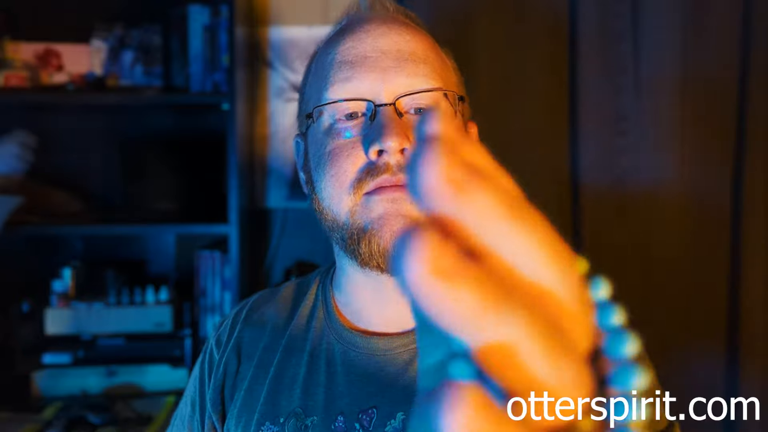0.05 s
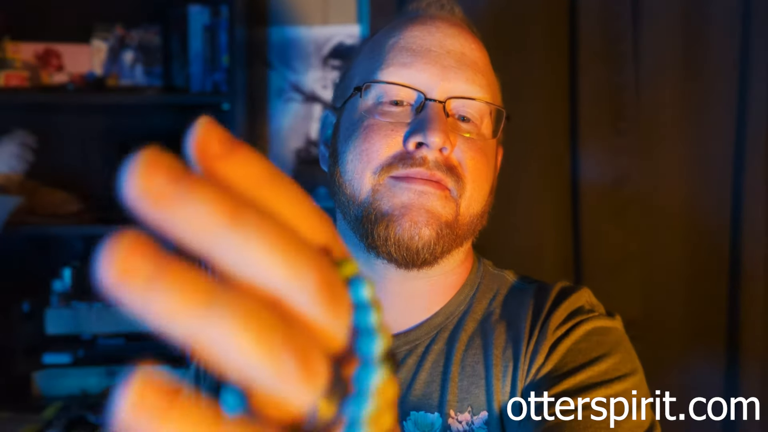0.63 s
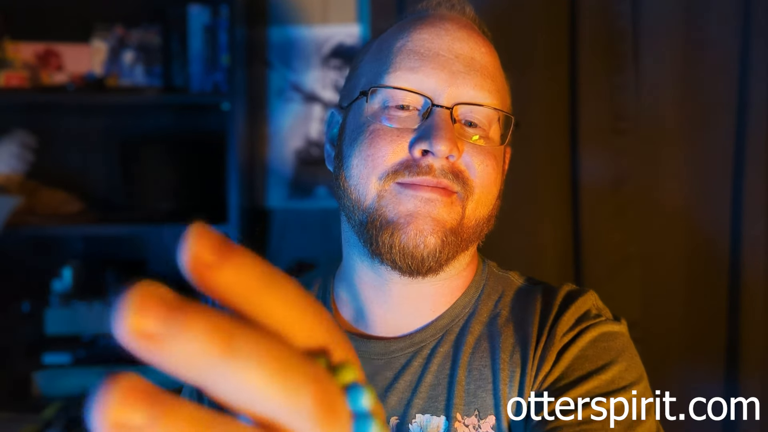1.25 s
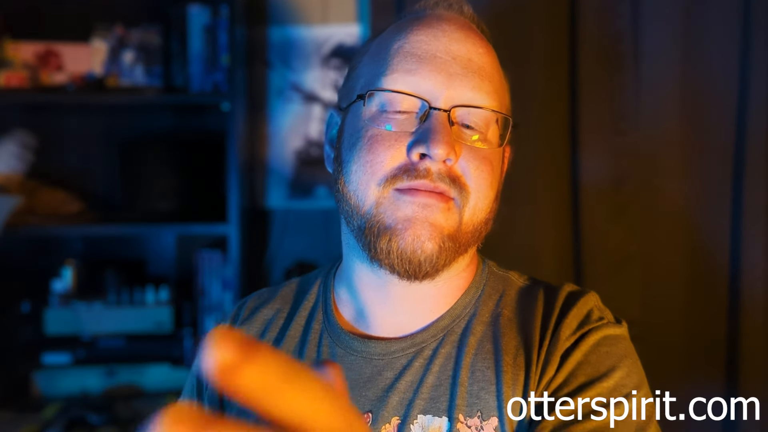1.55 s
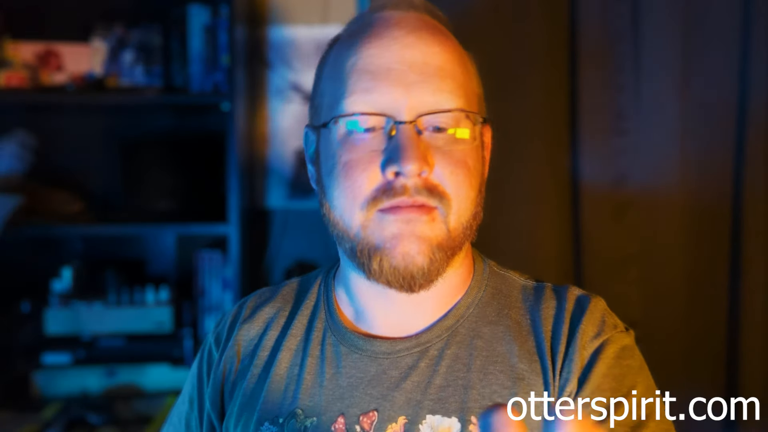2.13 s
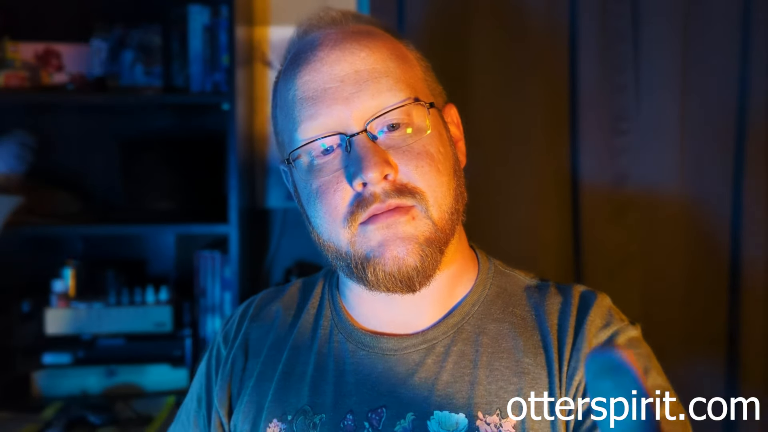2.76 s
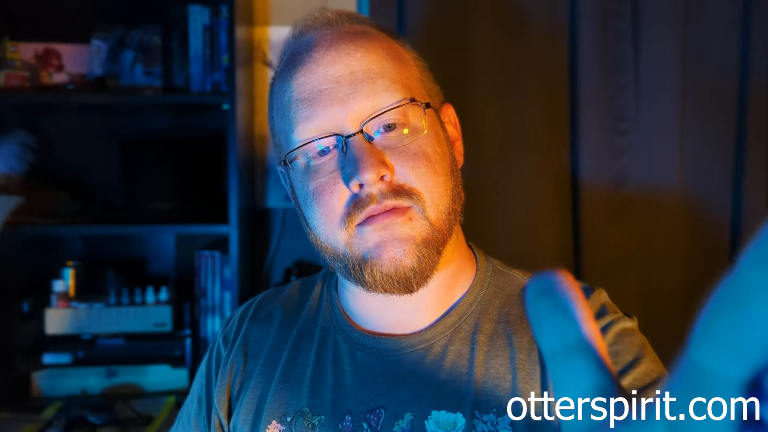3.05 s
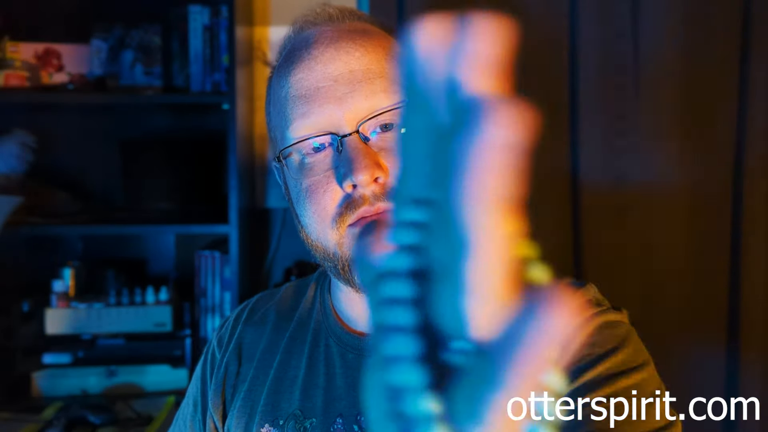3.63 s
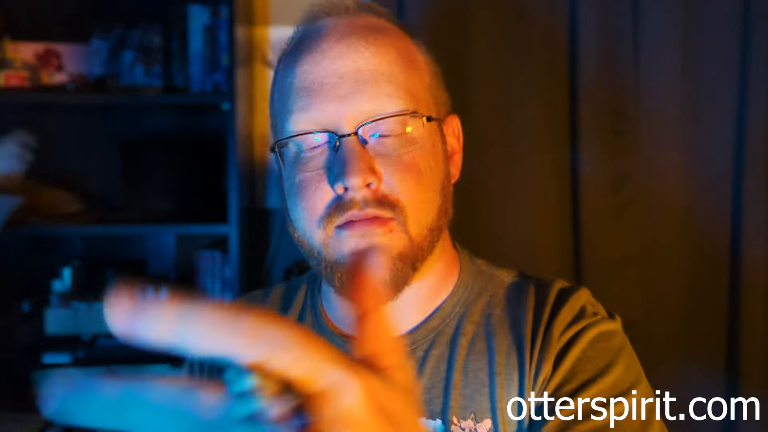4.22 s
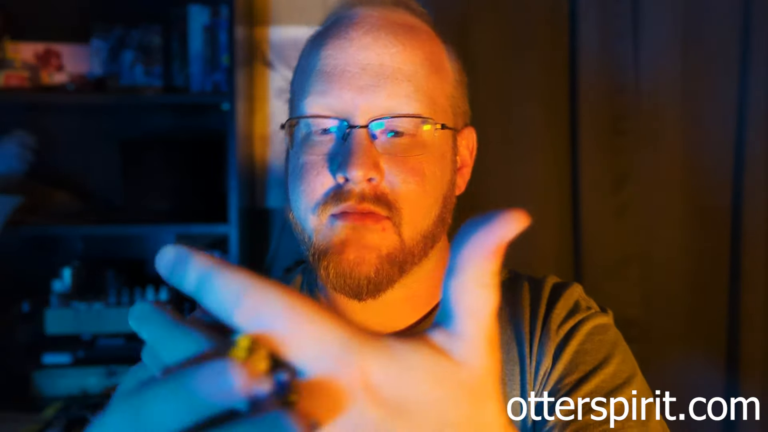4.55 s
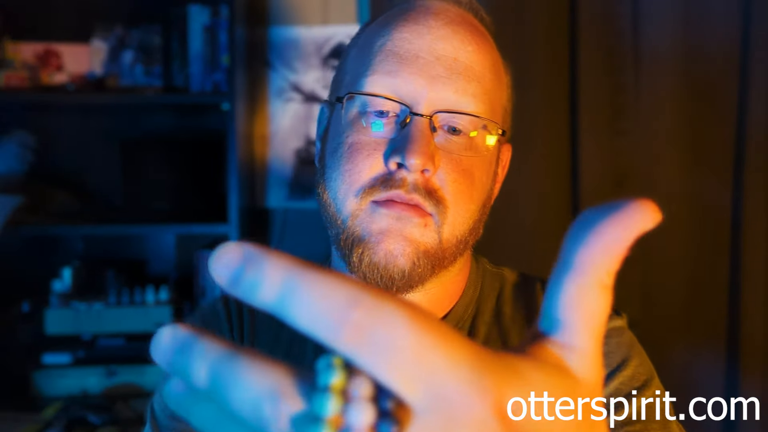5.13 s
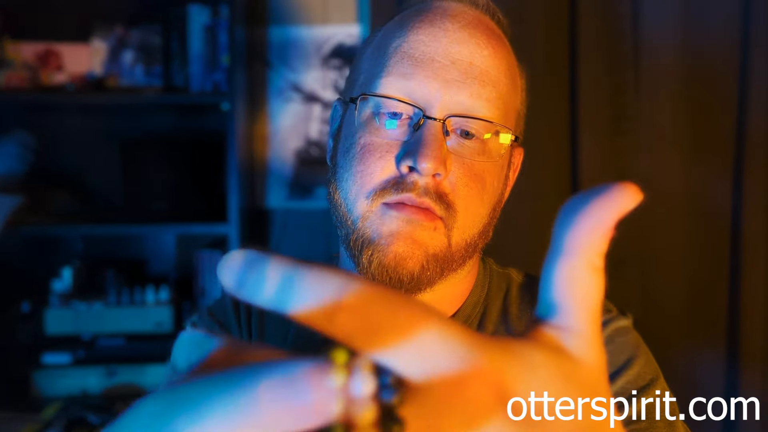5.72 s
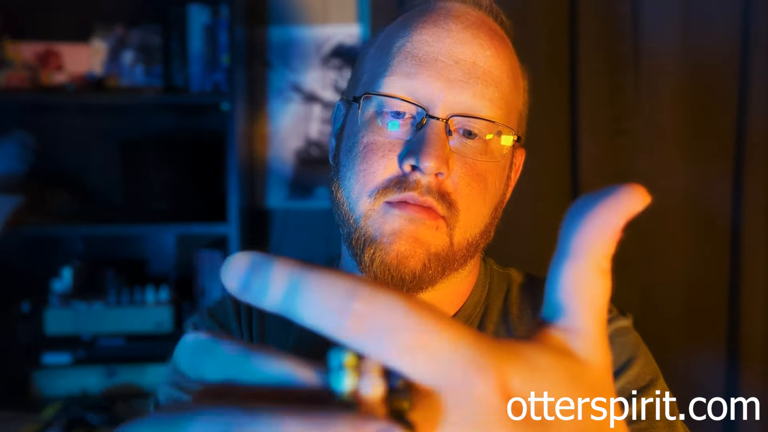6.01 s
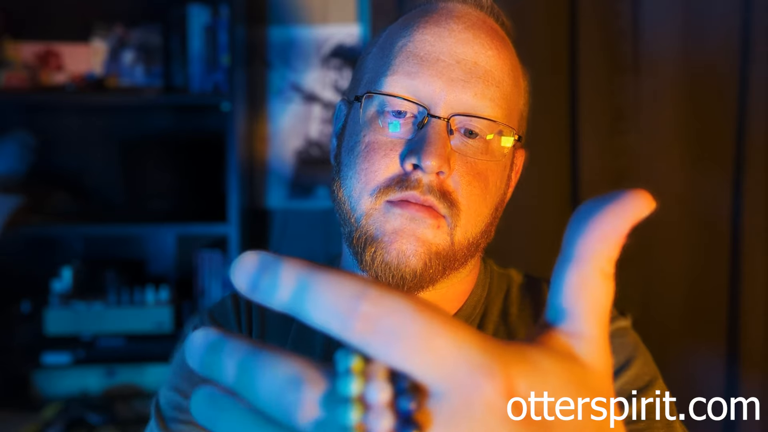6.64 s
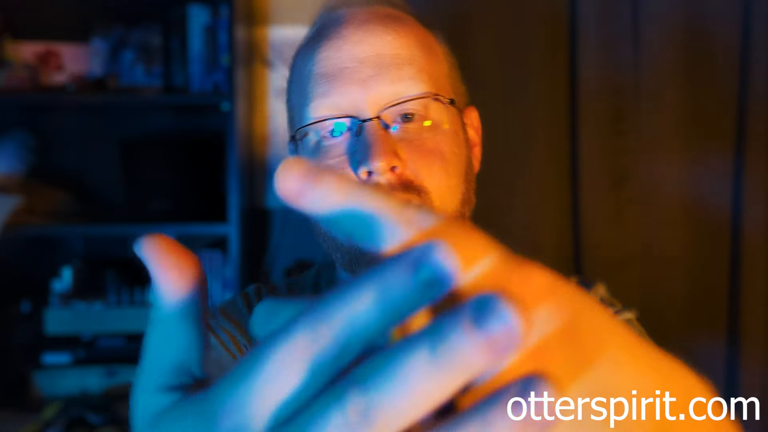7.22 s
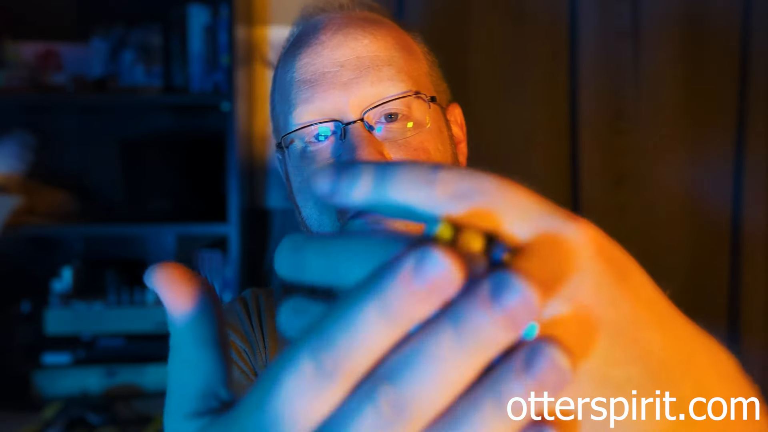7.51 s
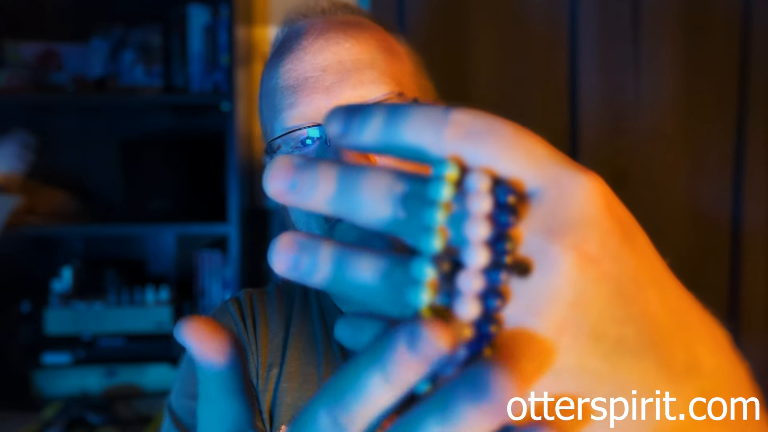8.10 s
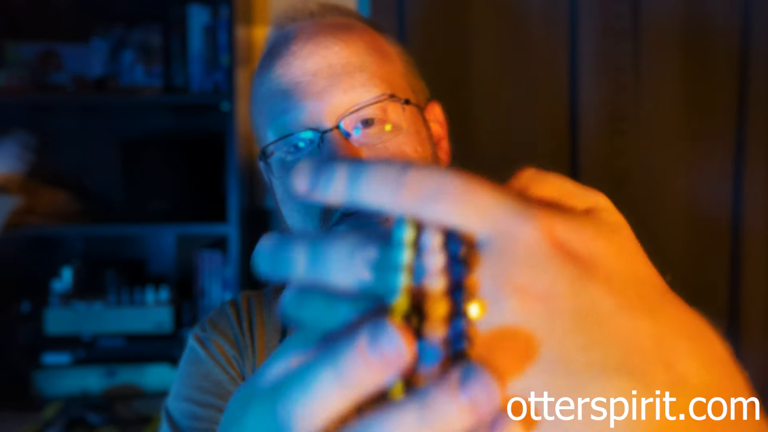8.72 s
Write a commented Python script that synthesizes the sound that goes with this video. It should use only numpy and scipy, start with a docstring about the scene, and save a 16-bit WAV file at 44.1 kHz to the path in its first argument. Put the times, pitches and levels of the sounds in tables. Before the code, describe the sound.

Polished stone beads click, snap and rattle against each other up close, with soft skin rubbing, in a small quiet room.

```python
"""Polished stone beads snap against each other as bracelets are rolled between two hands.
Some beads ring briefly, and lighter contacts chatter in between.
Pressed beads grind as they stick and slip, and skin rubs over the strands.
The hands are close to a stereo microphone in a small, quiet room. The hardest snaps overload the
recorder, and a dull low thud under some hard snaps is probably the recorder distorting."""
import sys
import numpy as np
from scipy import signal
from scipy.fft import rfft, irfft, next_fast_len
from scipy.io import wavfile
from scipy.ndimage import uniform_filter1d

SR = 44100
rng = np.random.default_rng(int(sys.argv[2]) if len(sys.argv) > 2 else 0)


def inscribe(sig):
    """Save sig as 16-bit PCM at rate SR to the path in sys.argv[1].

    A 1-D sig is mono; a 2-D sig holds one channel per row.
    Samples are clipped to [-1, 1] before scaling.
    """
    pcm = np.round(np.clip(np.atleast_2d(sig).T, -1, 1) * 32767)
    wavfile.write(sys.argv[1], SR, pcm.astype(np.int16))


N = 395136


def amp(db):
    """Turn decibels into a gain."""
    return 10 ** (np.asarray(db) / 20)


def unit(x):
    """Scale a signal to an average (rms) level of 1."""
    return x / np.sqrt(np.mean(x ** 2) + 1e-20)


def at_hz(rows, hz):
    """Read a (frequency, value) table between its rows, on a log frequency axis."""
    freqs, values = np.transpose(rows)
    return np.interp(np.log(hz + 1), np.log(freqs), values)


def at_time(rows, times, column=1):
    """Read one column of a table at the given times."""
    rows = np.asarray(rows)
    return np.interp(times, rows[:, 0], rows[:, column])


def filtered(x, gain):
    """Turn each frequency of x up or down by gain(hz)."""
    size = next_fast_len(N + SR // 2)
    return irfft(rfft(x, size) * gain(np.fft.rfftfreq(size, 1 / SR)), size)[..., :N]


def tone_filter(colour, size):
    """A filter with the given tone colour that never sounds before the hit (minimum phase)."""
    cepstrum = irfft(np.log(amp(at_hz(colour, np.fft.rfftfreq(size, 1 / SR)))))
    cepstrum[1:size // 2] *= 2
    cepstrum[size // 2 + 1:] = 0
    return np.exp(rfft(cepstrum))


def stereo_noise(shape, apart):
    """Noise shared by left and right, plus some of their own, scaled by `apart`."""
    return rng.standard_normal(shape) + apart * rng.standard_normal((2, *shape))


def same_energy(waves):
    """Give each short stereo wave the energy of 1 ms at level 1."""
    energy = (waves ** 2).sum(-1, keepdims=True).mean(0)
    return waves * np.sqrt(SR / 1000 / energy)


# Tone of the background noise: (frequency [Hz], relative level [dB])
NOISE_COLOUR = [(20, 1), (45, 4.5), (70, -4), (110, -2.5), (200, -10), (320, -12), (520, -19.5),
                (1200, -25.5), (2200, -29), (5000, -30.5), (16000, -33)]
# Steady tones of the hum: (frequency [Hz], level [dB])
HUM_TONES = [(99, -68), (120, -68), (308, -73)]
def background():
    """Low room rumble and microphone hiss, with a faint hum."""
    t = np.arange(N) / SR
    noise = unit(filtered(stereo_noise((N,), apart=1.0), lambda hz: amp(at_hz(NOISE_COLOUR, hz))))
    hum = sum(amp(db) * np.sqrt(2) * np.sin(2 * np.pi * (hz * t + rng.random((2, 1)) / 4))
              for hz, db in HUM_TONES)
    return amp(-52.5) * noise + hum


# How long the room echoes: (frequency [Hz], time to fade by 60 dB [s])
ROOM_FADE = [(200, 0.052), (2000, 0.11), (7000, 0.065), (11500, 0.083), (16000, 0.033)]
def room(x, block=2048, count=12):
    """The walls add a short, soft tail; several tails take turns, as if the hands were moving."""
    hz, t, noise = signal.stft(rng.standard_normal((count, 2, SR // 4)), SR, nperseg=256)
    fade = amp(-60 * t / at_hz(ROOM_FADE, hz)[:, None])
    tails = signal.istft(noise * fade, SR, nperseg=256)[1]
    tails *= np.minimum(np.arange(tails.shape[-1]) / SR / .004, 1)  # swell over 4 ms
    tails /= np.linalg.norm(tails, axis=-1, keepdims=True)
    out = np.zeros((2, N + SR))
    for k, start in enumerate(range(0, N, block)):
        echo = signal.fftconvolve(x[:, start:start + block], tails[k % count], axes=1)
        out[:, start:start + echo.shape[1]] += echo
    return out[:, :N]


# Where the hands are: (time [s], left minus right level [dB], head start of the left side [microseconds])
HAND_PLACE = [(0, -1, 42), (0.5, -4.5, 31.2), (1.05, -5, 26), (1.55, -6.5, 4.4), (2.1, -2, 4.97),
              (2.55, 5.5, 18.7), (3.15, 3, 41), (3.5, 0.5, 49), (4.05, -4.5, 20.4), (4.5, -6.5, 4.2),
              (5, -4, 10), (7.05, -4.5, 11.8), (7.4, -1, 29), (8.25, -2.3, 37.8), (8.96, -2.5, 16.9)]
def placed(times, waves, margin=8):
    """Play short waves at the given times, each a little to one side of the hands."""
    pan_db = at_time(HAND_PLACE, times) + 3 * rng.standard_normal(len(times))
    lead_s = (at_time(HAND_PLACE, times, column=2) + 6 * rng.standard_normal(len(times))) / 1e6
    gains = amp([pan_db / 2, -pan_db / 2])
    gains /= np.sqrt(np.mean(gains ** 2, axis=0))
    waves = np.pad(waves, ((0, 0), (0, 0), (margin, margin)))
    hz = np.fft.rfftfreq(waves.shape[-1], 1 / SR)
    time_shift = np.exp(1j * np.pi * hz * np.array([lead_s, -lead_s])[..., None])
    waves = irfft(rfft(waves) * time_shift) * gains[..., None]
    starts = np.abs(np.round(times * SR) - margin).astype(int)
    index = starts[:, None] + np.arange(waves.shape[-1])
    return np.array([np.bincount(index.ravel(), side.ravel(), N)[:N] for side in waves])


# The hollow between the rubbing palms: (time [s], upper resonance [Hz], level [dB])
PALM_HOLLOW = [(0, 6690, -45.5), (.27, 6700, -50), (.36, 6940, -58), (2.35, 8000, -70), (2.6, 8340, -63.5),
               (2.95, 7850, -49), (3.35, 6900, -50.5), (3.65, 6910, -64), (3.85, 6880, -47.5),
               (4.3, 7000, -83)]
def palms(width_hz=720, low_hz=2170, low_db=-17):
    """Skin catches on the beads in tiny grains and sounds the hollow of the hands, lower as it opens."""
    t = np.arange(N) / SR
    phase = 2 * np.pi * np.cumsum(at_time(PALM_HOLLOW, t)) / SR
    flicker = unit(filtered(rng.standard_normal(N), lambda hz: 1 / (1 + (hz / 200) ** 2)))
    grain = amp(8 * flicker)
    band = filtered(stereo_noise((2, N), apart=1.0), lambda hz: 1 / (1 + (hz / width_hz) ** 3))
    hiss = band[:, 0] * np.cos(phase) + band[:, 1] * np.sin(phase)  # moved up to the resonance
    low = filtered(stereo_noise((N,), apart=0.5),
                   lambda hz: 1 / (1 + ((hz - low_hz) / (width_hz / 2)) ** 4))
    rub = unit(grain * hiss) + amp(low_db) * unit(grain * low)
    pan_db = at_time(HAND_PLACE, t)
    return rub * amp(at_time(PALM_HOLLOW, t, column=2)) * amp([pan_db / 2, -pan_db / 2])


# Beads grinding: (middle time [s], half length [s], lower resonance [Hz], base width [Hz], level [dB])
GRINDS = [(1.664, 0.0035, 4210, 800, -29), (2.619, 0.0022, 4280, 800, -28), (4.564, 0.048, 2650, 700, -42),
          (4.901, 0.035, 2293, 801.3, -56), (5.062, 0.01, 3357, 900, -35.5),
          (5.211, 0.032, 1849, 805, -44.5), (5.444, 0.0076, 2150, 1380, -31.5),
          (5.721, 0.01, 1920, 700, -48.5), (5.76, 0.0048, 2482, 1200, -37),
          (5.888, 0.011, 3568, 500, -35.5), (6.063, 0.016, 4150, 679.3, -41.5),
          (6.792, 0.018, 2420, 1000, -47), (7.358, 0.017, 2703, 900, -46),
          (7.828, 0.0038, 3000, 514.6, -45.5), (8.589, 0.03, 2998, 1003, -53),
          (8.717, 0.0081, 2065, 502, -48)]
def grinding(slips_per_second):
    """Pressed beads stick and slip; the slips ring two resonances of the strand in the fingers."""
    out = np.zeros((2, N))
    t = np.arange(SR // 4) / SR - 1 / 8
    freqs = np.fft.rfftfreq(len(t), 1 / SR)
    for middle, half_length, hz, width, db in GRINDS:
        slips = stereo_noise(t.shape, apart=0.35) * (0.03 + (rng.random(len(t)) < slips_per_second / SR))
        damping = 1.5j * freqs * width
        low, high = [(damping / (peak ** 2 - freqs ** 2 + damping)) ** 2 for peak in (hz, 1.73 * hz)]
        rasp = unit(irfft(rfft(slips) * (low + 0.78 * high), len(t)))
        swell = np.exp(-(t / half_length) ** 2 / 2)
        start = round((middle + t[0]) * SR)
        out[:, start:start + len(t)] += amp(db) * rasp * swell
    return out * amp([[-1.5], [1.5]])  # a little to the right


# A harder, shorter hit is brighter: (frequency [Hz], change per step of hardness [dB])
HARDNESS_TILT = [(6000, -2.5), (14000, 2)]
def contacts(count, colour, touch_s, apart, hardness=0, size=400):
    """The sound of a hit: a tiny burst of noise, brighter when harder, and a usually weaker rebound."""
    t = np.arange(size) / SR
    length, gap, bounce, angle = rng.standard_normal((4, count, 1))  # no two hits are alike
    fade_s = touch_s * np.exp(0.46 * length)
    since_rebound = t - 0.0016 * np.exp(gap / 2)
    rebound = amp(-5.5 + 6.2 * bounce) * np.exp(-np.abs(since_rebound) / fade_s) * (since_rebound > 0)
    burst = stereo_noise((count, size), apart) * (np.exp(-t / fade_s) + rebound)
    tone = tone_filter(colour, size) * tone_filter(HARDNESS_TILT, size) ** (angle + hardness)
    return same_energy(irfft(rfft(burst) * tone))


# Low thuds under some hard snaps: (time [s], relative level [dB])
LOW_THUDS = [(0.792, -36.5), (1.24, -31.5), (1.368, -32.5), (1.436, -36.5), (1.522, -24.5), (2.126, -36),
             (2.154, -34.5), (4.493, -28), (5.494, -28.5), (6.38, -18)]
def thuds():
    """A dull low thud under some hard snaps, probably the recorder distorting."""
    times, db = np.transpose(LOW_THUDS)
    dull = [(60, 1.0), (200, -9.5), (750, -8), (1500, -12.5), (5000, -15.0)]  # (frequency [Hz], level [dB])
    bursts = contacts(len(times), dull, touch_s=0.00017, apart=0.61)
    return placed(times, amp(db + 10.5)[:, None] * bursts)


# Strokes of the hands: (start [s], length [s], rolling strength [dB], relative clack level [dB])
HAND_STROKES = [(0, 0.29, -33, -15), (0.38, 0.08, -41, -18.5), (0.53, 0.09, -43, -18),
                (0.629, 0.13, -33, -15), (0.781, 0.24, -28, -13), (1.052, 0.12, -34, -20.5),
                (1.23, 0.08, -34, -11), (1.358, 0.25, -29, -12.5), (1.644, 0.12, -38, -14),
                (1.828, 0.07, -50, -13), (2.089, 0.21, -25.5, -9), (2.332, 0.11, -38, -15.5),
                (2.459, 0.19, -31, -20), (2.69, 0.11, -36, -26), (2.879, 0.34, -36, -25),
                (3.25, 0.3, -36, -23.5), (3.623, 0.1, -44, -17), (3.78, 0.05, -39, -15.5),
                (3.87, 0.31, -39, -21.5), (4.492, 0.15, -27, -12.5), (4.807, 0.04, -31, -10.5),
                (4.87, 0.08, -40, -10.5), (4.999, 0.08, -30, -6.5), (5.158, 0.19, -31, -11.5),
                (5.429, 0.19, -33.5, -11), (5.727, 0.07, -30, -9.5), (5.891, 0.12, -33, -9.5),
                (6.043, 0.08, -37, -13), (6.277, 0.04, -38, -11), (6.363, 0.04, -19, -20.5),
                (6.547, 0.05, -30, -10.5), (6.677, 0.15, -32, -14), (6.949, 0.05, -37.5, -17),
                (7.078, 0.15, -43, -22), (7.318, 0.25, -40, -12), (7.597, 0.16, -45, -14.5),
                (7.818, 0.21, -52, -7), (8.279, 0.04, -39, -8.5), (8.512, 0.12, -35, -12.5),
                (8.653, 0.27, -42, -14.5)]
def rolling(times, rise_db_per_s=900, fall_db_per_s=380, rest_db=-66):
    """How strongly the beads stir, in dB: strokes roll them, and each snap jostles its neighbours."""
    t = np.arange(0, N / SR, .001)[:, None]
    start, length, db, _ = np.transpose(HAND_STROKES)
    snap_times, snap_db, _ = np.transpose(BEAD_SNAPS)
    before, after = np.maximum(start - t, 0), np.maximum(t - start - length, 0)
    stroked = amp(db - rise_db_per_s * before - fall_db_per_s * after)
    since_snap = t - snap_times
    jostled = (since_snap > 0) * amp(snap_db - 21 - 600 * np.abs(since_snap))  # settles at 600 dB/s
    # The strand catches just before a snap, so the stroke dips by up to 9 dB.
    stuck = ((since_snap <= 0) * np.exp(-(since_snap / 0.012) ** 2)).max(1)
    power = (stroked ** 2).sum(1) * amp(-9 * stuck) ** 2 + (jostled ** 2).sum(1) + amp(rest_db) ** 2
    return np.interp(times, t[:, 0], 10 * np.log10(power))


def pressing(times):
    """Pressed beads clack lower: the amount of low clack, in dB, holds for a stroke, then glides on."""
    start, length, _, clack_db = np.transpose(HAND_STROKES)
    edges = np.sort(np.concatenate([start, start + length]))
    return np.interp(times, edges, np.repeat(clack_db, 2))


# Tone of the bright tick in chatter and snaps: (frequency [Hz], relative level [dB])
TICK_COLOUR = [(100, -33.5), (1400, -28.5), (3000, -53.5), (5000, -13.5), (6500, 3), (8000, 5), (10500, 3),
               (13000, 6.5), (15500, 1.5), (17000, -7)]
# Tone of the clack in a light contact: (frequency [Hz], relative level [dB])
LIGHT_CLACK_COLOUR = [(100, -28), (1000, -29), (1500, -18), (2100, -5), (2800, -5.5), (3500, -0.5),
                      (4800, 2.5), (6000, 0), (8000, -6.5), (16000, -27.5)]
def chatter(base_per_second, spread_db):
    """Light contacts: dull single ticks when the strands barely move, a bright crowd when rolled hard."""
    t = np.arange(N) / SR
    rate = base_per_second * amp((np.clip(rolling(t), -60, -25) + 35) / 2)
    hits_so_far = np.cumsum(rate) / SR
    count = int(hits_so_far[-1])
    times = np.interp(np.arange(count) + rng.standard_normal(count), hits_so_far, t)
    roll_db = rolling(times)
    # Hits are uneven, but together they follow the rolling strength.
    strength = amp(spread_db * np.clip(rng.standard_normal(count), -2, 2))
    strength /= np.sqrt(np.abs(uniform_filter1d(strength ** 2, size=9)))
    level = strength * amp(roll_db + 3.0) * np.sqrt(base_per_second / np.interp(times, t, rate))
    hardness = np.maximum(roll_db[:, None] + 27.5, -20) / 10
    tick = contacts(count, TICK_COLOUR, touch_s=0.00066, apart=1.0, hardness=hardness)
    clack = contacts(count, LIGHT_CLACK_COLOUR, touch_s=0.0024, apart=0.29)
    clack *= amp(pressing(times) + 2.0)[:, None]
    return placed(times, level[:, None] * (tick + clack))


# Tones of a struck bead: (frequency [Hz], relative level [dB], time to fade by 60 dB [s])
BEAD_TONES = [(9400, -25, 0.0031), (11450, 22, 0.015), (12700, -13, .003)]
def rings(count, detune, size=400):
    """The brief, high ring of beads that differ slightly in size."""
    t = np.arange(size) / SR
    waves = 0
    for hz, db, fade_s in BEAD_TONES:
        pitch, strength, skew = rng.standard_normal((3, count, 1))
        phase = 2 * np.pi * hz * (1 + detune * pitch) * t + np.array([skew, -skew]) * 0.52
        waves = waves + amp(db + 2 * strength - 60 * t / fade_s) * np.sin(phase)
    return same_energy(waves)


# Tone of the clack in a snap: (frequency [Hz], relative level [dB])
SNAP_CLACK_COLOUR = [(100, -22), (900, -33.5), (1400, -14.5), (2100, -4.5), (2800, -7), (3600, 1),
                     (4800, 4), (6000, 4), (8000, -13.5), (16000, -49)]
# The loud bead snaps: (time [s], level [dB], relative ring level [dB])
BEAD_SNAPS = [(0.0098, -10.5, -19.5), (0.0298, -17, -19.5), (0.0633, -15, -17.5), (0.118, -16.5, -21.5),
              (0.1655, -13.5, -13.5), (0.227, -11, -23), (0.284, -19, -22), (0.4018, -18.5, -10.5),
              (0.4322, -22, -22), (0.549, -18, -10.5), (0.5698, -22, -17), (0.594, -20.5, -21),
              (0.6765, -14, -7.5), (0.7287, -15, -20), (0.7934, -9, 4.5), (0.8695, -9.5, -15.5),
              (0.9381, -7.5, 3), (0.9861, -11, -20), (1.0003, -13.5, -11.5), (1.0584, -14.5, -10),
              (1.1044, -13.5, 0), (1.1481, -12, -20), (1.1606, -13, -19), (1.2107, -18, -20),
              (1.2411, -11, 1), (1.2867, -11, -20), (1.3683, -9.5, -12.5), (1.4048, -13.5, -19),
              (1.4122, -10.5, -4), (1.4377, -8.5, -20), (1.4479, -10, -12), (1.4764, -11.5, -17),
              (1.5228, -6.5, -2), (1.5769, -10, -9), (1.5941, -8.5, -5.5), (1.6582, -17, -12),
              (1.6663, -19, -20), (1.72, -11, -23), (1.7422, -19, -14), (1.7505, -19.5, -14),
              (1.9675, -31, -3), (2.017, -10, -10), (2.092, -7, 3), (2.1143, -14, -18), (2.1277, -5, -17),
              (2.1605, -1.5, -23), (2.1986, -7.5, -14), (2.2374, -13, -20), (2.25, -10.5, -14),
              (2.2743, -12, -13), (2.2871, -5, -20), (2.2973, -16, -19.5), (2.3962, -12, -13),
              (2.4036, -18, -7), (2.41, -17, -23), (2.468, -10, -22), (2.4918, -19.5, -18.5),
              (2.5379, -16.5, -9), (2.543, -11, -3), (2.6067, -16, -16), (2.6191, -14.5, -17),
              (2.6582, -14, -14), (2.6933, -19, -12), (2.7436, -9.5, -24), (2.7652, -18.5, -24),
              (2.797, -12.5, -18), (2.8864, -10.5, -21), (2.9352, -14.5, -22), (3.0153, -19, -26),
              (3.1044, -17.5, -20), (3.1157, -16, -19), (3.12, -16, -18), (3.1533, -16.5, -20),
              (3.1855, -17.5, -20), (3.2018, -16.5, -20), (3.3288, -20, -20), (3.4383, -19.5, -18),
              (3.4628, -19.5, -20), (3.7937, -16.5, -29), (3.8064, -18, -18), (4.0147, -23, -5),
              (4.1061, -22.5, -2), (4.4872, -2.5, -16), (4.4945, -10.5, -11.5), (4.5253, -8, 0),
              (4.597, -9.5, -1.5), (4.6087, -14.5, -19), (4.6223, -11.5, -9), (4.8214, -9, -5.5),
              (4.8295, -18, -12), (4.8655, -16, -18), (4.885, -13.5, -1.5), (5.0064, -16, -20),
              (5.0128, -17, -20), (5.021, -16.5, -3), (5.067, -17.5, -1.5), (5.2778, -12.5, -1),
              (5.3187, -9.5, -3), (5.3262, -12, -5), (5.3451, -16.5, -7), (5.4342, -12.5, -7),
              (5.4389, -14.5, -8), (5.493, -7, -9.5), (5.5037, -12.5, -9), (5.51, -11.5, -10),
              (5.5394, -8, -20), (5.5543, -15.5, -20), (5.5663, -13.5, -8), (5.7639, -11, -6),
              (5.93, -15, -8), (5.957, -13.5, -22), (5.9727, -6, 0), (5.9834, -14.5, -3), (5.9914, -5.5, 2),
              (6.0912, -20, -7), (6.1798, -4, 1.5), (6.1842, -11.5, 10), (6.1924, -12, -8),
              (6.3143, -21.5, -22), (6.368, -9.5, -8), (6.3809, -6.5, 11), (6.3898, -9.5, -9),
              (6.5503, -15, -14), (6.573, -9, 2), (6.5899, -10.5, -9), (6.7649, -7, -1.5),
              (6.8193, -16, -6), (6.9577, -19, -4), (6.984, -10.5, -13), (7.0902, -24.5, -20),
              (7.4649, -14.5, -5.5), (7.6092, -23.5, -4), (7.8531, -26, -15), (7.9319, -26, -8),
              (8.101, -17, -20), (8.2804, -12.5, -11), (8.567, -13, -19.5), (8.9171, -11.5, -3.5),
              (8.9266, -6, -11.5), (8.943, -20.5, -7)]
def snaps(clack_spread_db=3.5):
    """A bead slides over its neighbour and hits the next: a bright tick, a lower clack and a ring."""
    times, db, ring_db = np.transpose(BEAD_SNAPS)
    count = len(times)
    clack_db = pressing(times) - 4.5 + clack_spread_db * rng.standard_normal(count)
    hardness = (db[:, None] + 15.5) / 10
    tick = amp(-0.5) * contacts(count, TICK_COLOUR, touch_s=0.00029, apart=0.68, hardness=hardness)
    clack = amp(clack_db)[:, None] * contacts(count, SNAP_CLACK_COLOUR, touch_s=0.0012, apart=0.75)
    ring = amp(ring_db + 2.5)[:, None] * rings(count, detune=0.026)
    return placed(times, amp(db)[:, None] * (tick + clack + ring))


def scene():
    """Hands and beads with their soft echo, plus the low thuds and the background."""
    bracelets = palms() + snaps() + chatter(base_per_second=240, spread_db=11)
    bracelets += grinding(slips_per_second=560)
    return bracelets + amp(-14.0) * room(bracelets) + thuds() + background()


def record(dry, ceiling=.95, top_hz=16150):
    """The recorder overloads on the hardest snaps, rounding their peaks, then cuts the highest treble."""
    clipped = dry / (1 + np.abs(dry / ceiling) ** 6) ** (1 / 6)
    return filtered(clipped, lambda hz: 1 / np.sqrt(1 + (hz / top_hz) ** 140))


dry = scene()
out = record(dry)
inscribe(out)
```